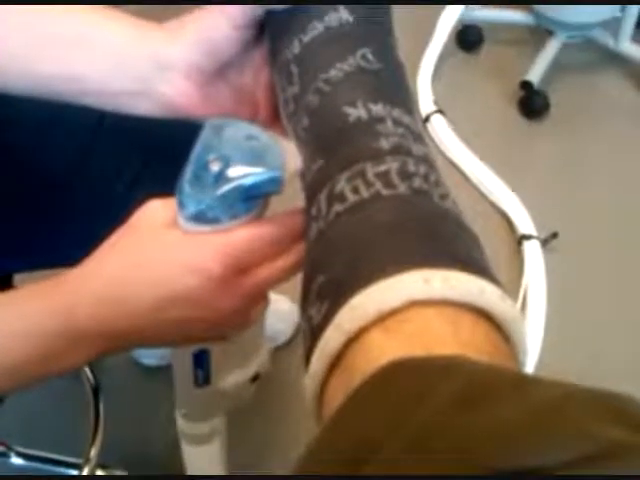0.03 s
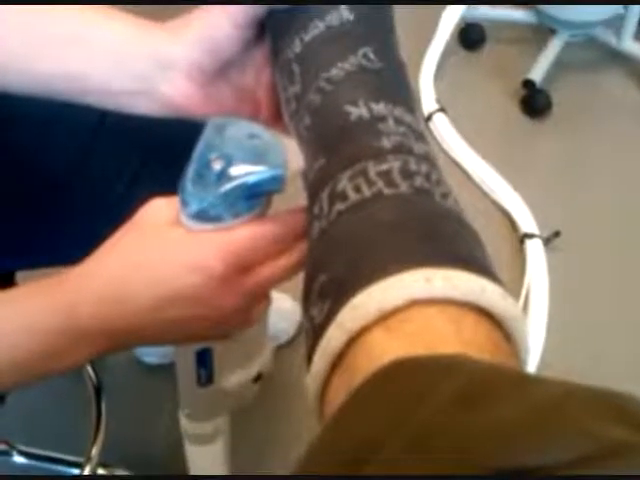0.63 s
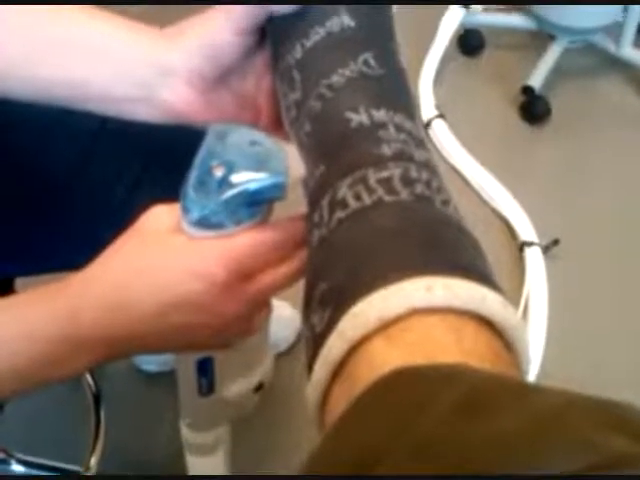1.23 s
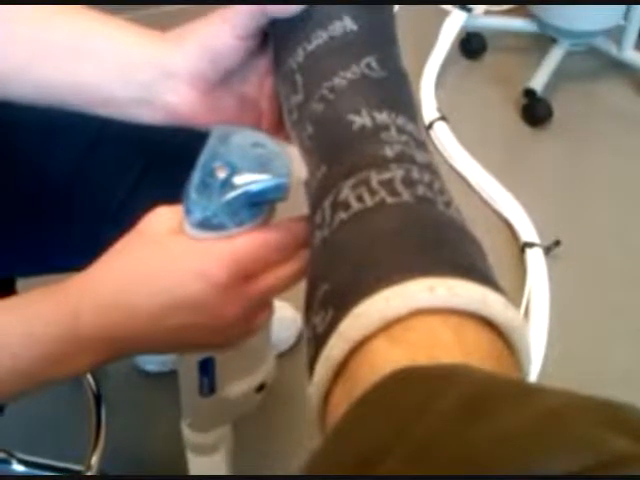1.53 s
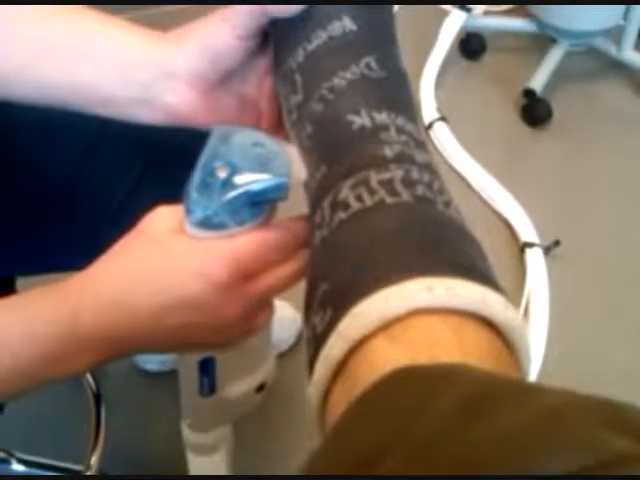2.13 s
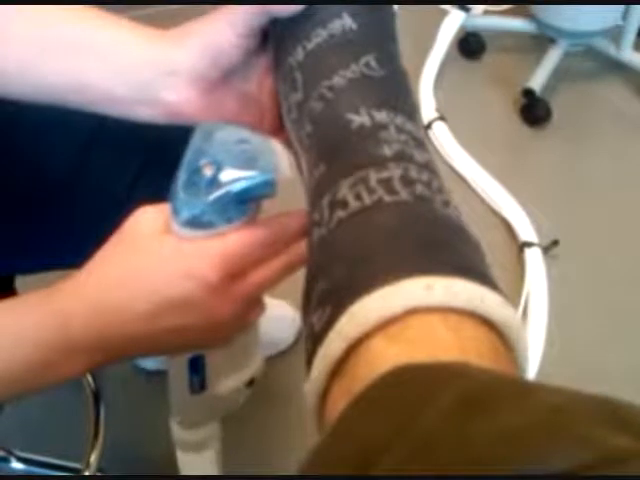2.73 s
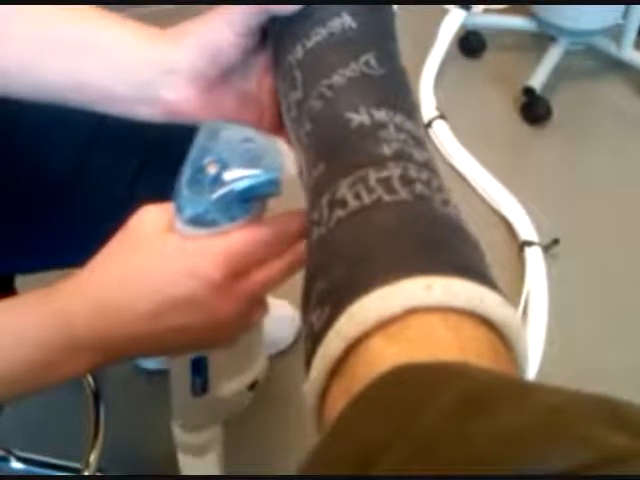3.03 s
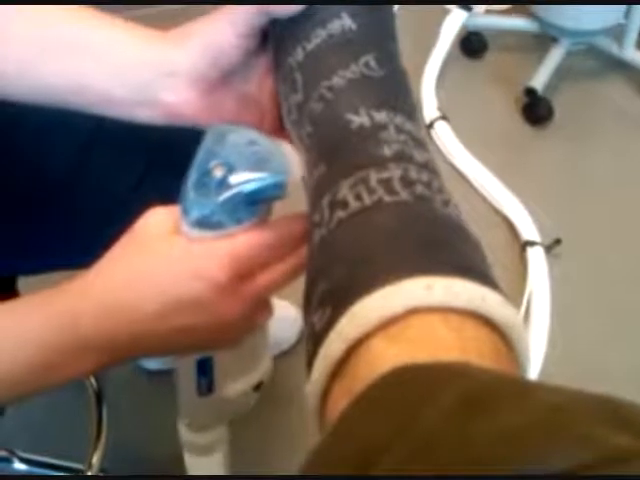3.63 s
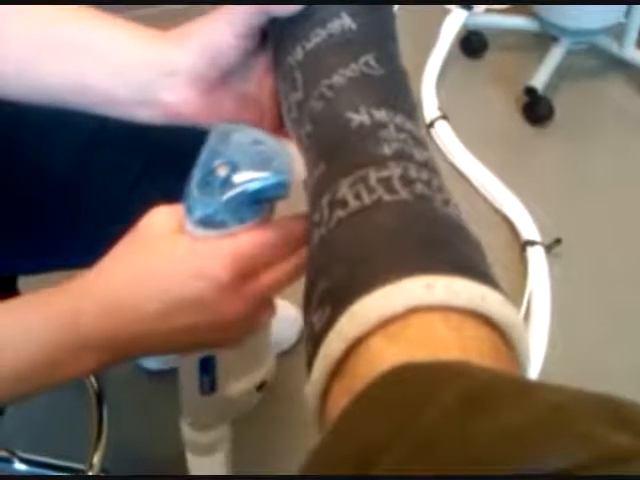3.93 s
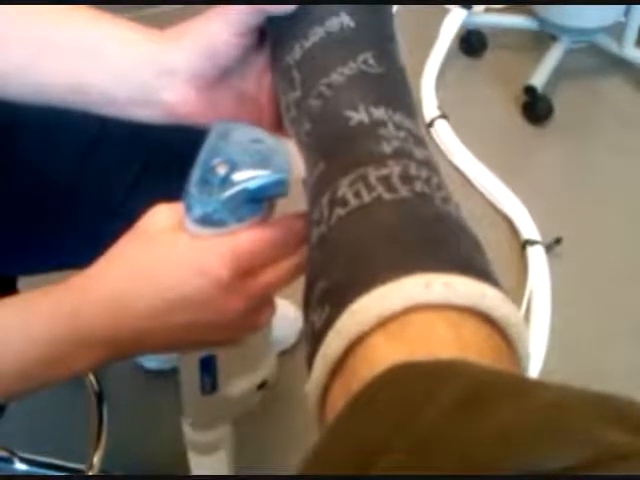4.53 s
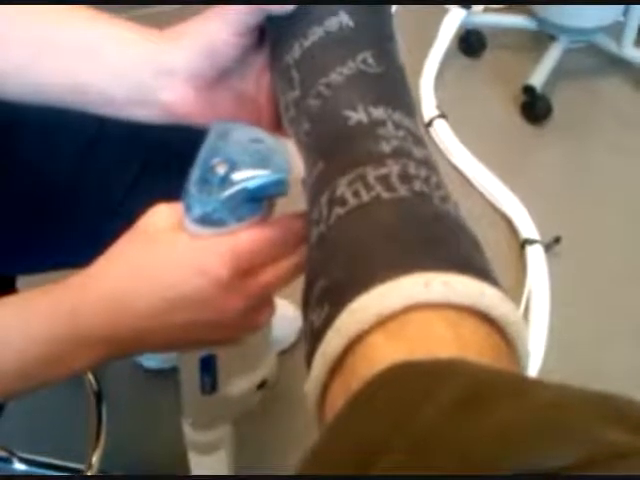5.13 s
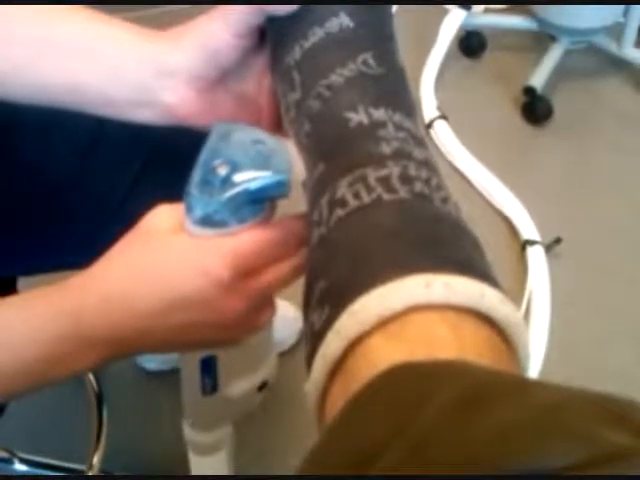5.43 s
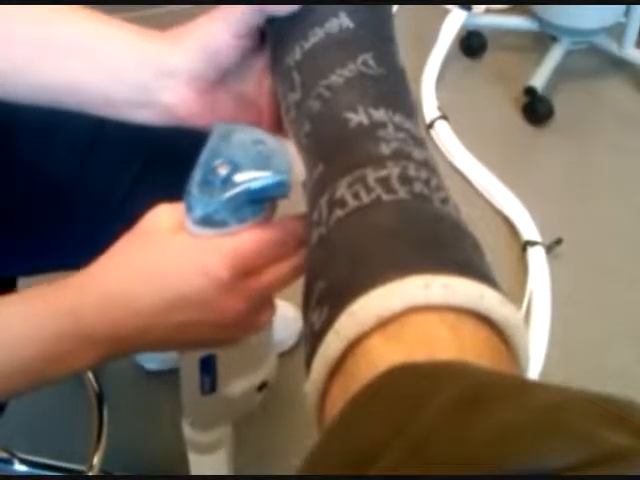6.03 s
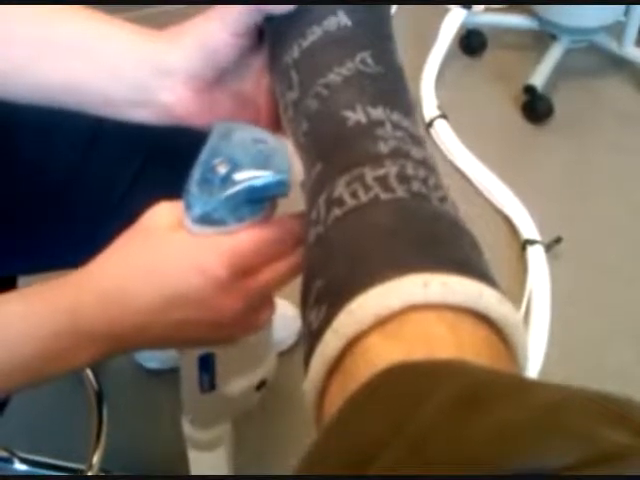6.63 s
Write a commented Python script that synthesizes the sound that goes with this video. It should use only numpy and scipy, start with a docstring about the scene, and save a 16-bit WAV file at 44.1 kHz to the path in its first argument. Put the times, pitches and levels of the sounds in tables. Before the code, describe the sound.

An electric cast saw runs for the whole seven seconds, heard from about an arm's length in a small room with slight reverberation. From the start it is cutting a hard leg cast: a harsh, bright buzz with gritty rasp, shell rattle and hiss, swelling in small pushes, with brief squealing tones. At about 2.4 seconds the blade eases out of the cut. The saw speeds up slightly and gives a higher, cleaner ringing whine until about 3.6 seconds. It then grazes the shell with a fuller buzz, and at about 4.5 seconds bites in again, its pitch dropping back. The cutting continues to the end with uneven surges and short squeals, the clearest around 5.7 and 6.6 seconds. A faint motor hum and a soft rush of cooling air lie underneath throughout.

```python
"""An electric cast saw cuts along a hard leg cast in a small treatment room.
Its blade swings about 183 times a second, and this periodic drive excites a harmonic series: motor hum
below, the buzz of shell and blade above. Tooth impacts and tearing fibres add rattle, rasp and hiss over
faint cooling air. Midway the saw is eased out of the cut; unloaded, it speeds up and sings more purely,
then grazes the shell and bites again."""
import sys
import numpy as np
from scipy import signal
from scipy.fft import rfft, irfft, next_fast_len
from scipy.io import wavfile

SR = 44100
rng = np.random.default_rng(int(sys.argv[2]) if len(sys.argv) > 2 else 0)


def transcribe(signal):
    """Save signal, clipped to [-1, 1], as a 16-bit WAV file at the path in sys.argv[1]."""
    frames = np.atleast_2d(signal).T
    limited = np.clip(frames, -1, 1)
    pcm = np.round(limited * 32767).astype(np.int16)
    wavfile.write(sys.argv[1], SR, pcm)


N = 302967
TIME = np.arange(N) / SR
MAINS_HZ = 60


def from_db(db):
    return 10 ** (np.asarray(db) / 20)


def rms_one(x):
    return x / np.sqrt(np.mean(x ** 2) + 1e-20)


def in_time(rows):
    """Linear interpolation of (seconds, value) rows at every sample."""
    return np.interp(TIME, *np.transpose(rows))


def filtered(x, gain_at):
    """Zero-phase filtering: the spectrum is multiplied by a gain that depends on frequency."""
    size = next_fast_len(N + 4096)
    return irfft(rfft(x, size) * gain_at(np.fft.rfftfreq(size, 1 / SR)), size)[:N]


def coloured(x, spectrum):
    """Spectral shaping by an envelope drawn on a log-frequency axis; the result has rms 1."""
    points_hz, level_db = np.transpose(spectrum)
    return rms_one(filtered(x, lambda hz: from_db(np.interp(np.log(hz + 1), np.log(points_hz), level_db))))


def drift(rate_hz):
    """Slow random fluctuation of rms 1: low-passed noise, computed at every 20th sample."""
    pole = np.exp(-40 * np.pi * rate_hz / SR)
    slow = signal.lfilter([1], [1, -2 * pole, pole * pole], rng.standard_normal(N // 20 + 1002))[1000:]
    return np.interp(np.arange(N) / 20, np.arange(len(slow)), rms_one(slow))


def partial(cycles, harmonic, roughness, dispersion=.065):
    """A harmonic with random amplitude and phase modulation; dispersion makes higher ones lag."""
    angle = 2 * np.pi * (harmonic * cycles - dispersion * harmonic ** 2)
    in_phase = (1 + roughness * drift(13)) * np.cos(angle)
    quadrature = 0.77 * roughness * drift(13) * np.sin(angle)
    return np.sqrt(2) * (in_phase + quadrature)


def mains_ripple(once, twice):
    """Torque ripple: the motor pulses once and twice per mains cycle."""
    angle = 2 * np.pi * MAINS_HZ * TIME
    return once * np.cos(angle) + twice * np.cos(2 * angle)


def room(x, t60_s=.3):
    """Reverberation: dense reflections from near walls decay exponentially."""
    age = TIME[:SR // 2]
    tail = rng.standard_normal(len(age)) * from_db(-60 * age / t60_s) * (age > .004)
    return signal.fftconvolve(x, tail / np.linalg.norm(tail))[:N]


# Spectrum of the motor's cooling air. Each row: frequency in Hz, relative density in dB.
AIR_SPECTRUM = [(25, -2), (55, -42.5), (100, -8), (150, -11), (240, -22.5), (310, -9.5), (480, -2.5),
                (670, -10), (900, -2), (4000, -51)]
def cooling_air(bite):
    """Flow noise from the motor's cooling air, a little louder under load."""
    return from_db(-58.945 + 3.27 * bite) * coloured(rng.standard_normal(N), AIR_SPECTRUM)


def winding_hum():
    """Mains hum: the windings vibrate at the fifth harmonic of the supply."""
    return from_db(-65) * partial(MAINS_HZ * TIME, 5, roughness=0.27)


def knocks(strokes, uneven_db, jitter_s):
    """An impulse train: the teeth hit the kerf going out and more lightly coming back."""
    out = np.zeros(N)
    for phase, strength in ((0, 0.75), (.43, 0.32)):
        at = np.flatnonzero(np.diff(np.floor(strokes - phase)) > 0)
        timing, height = rng.standard_normal((2000, 2))[:len(at)].T
        at = np.clip(at + np.round(jitter_s * SR * timing).astype(int), 0, N - 1)
        out[at] += strength * from_db(uneven_db * height)
    return out


def smeared(x, spread_s):
    """Multipath propagation: the shell spreads a knock in time without favouring a pitch."""
    age = TIME[:SR // 40]
    paths = rfft(rng.standard_normal(len(age)) * np.exp(-age / spread_s), 2 * len(age))
    all_pass = np.fft.fftshift(irfft(paths / np.abs(paths)))
    return signal.oaconvolve(x, all_pass)[len(age):len(age) + N]


def sawing(strokes, spectrum, grit, spread_s, bunching, uneven_db, jitter_s):
    """Impact and fracture noise: teeth knock and fibres tear; grit is the tearing's share of the power."""
    clicks = knocks(strokes, uneven_db, jitter_s)
    # the point of contact slides, so the paths change and single partials come and go
    slide = 1.2 * drift(1.5)
    hits = np.cos(slide) * smeared(clicks, spread_s) + np.sin(slide) * smeared(clicks, spread_s)
    bursts = np.exp(bunching * np.cos(2 * np.pi * strokes))
    tearing = rng.standard_normal(N) * bursts * from_db(uneven_db * 1.5 * np.tanh(drift(140) / 1.5))
    excitation = np.sqrt(1 - grit) * rms_one(hits) + np.sqrt(grit) * rms_one(tearing)
    return coloured(excitation * (1 + mains_ripple(once=0.06, twice=0.03)), spectrum)


# Spectrum of the cast's shell. Each row: frequency in Hz, relative density in dB.
SHELL_SPECTRUM = [(760, -38.5), (930, -18), (1080, -4), (1450, -4), (1720, 4), (1950, -1), (2300, -19),
                  (3000, -46.5)]
def shell_rattle(strokes, bite, drive_db, rise_db_per_s=.5):
    """Forced vibration of the shell, growing as the cut moves along the cast."""
    gain = from_db(-40.5 + rise_db_per_s * TIME + drive_db - 2 * (1 - bite))
    return gain * sawing(strokes, SHELL_SPECTRUM, grit=0.81, spread_s=.0015,
                         bunching=0.24, uneven_db=3.5, jitter_s=8e-5)


# Spectrum of the rasping kerf. Each row: frequency in Hz, relative density in dB.
KERF_SPECTRUM = [(1400, -53.5), (1800, -11.5), (2100, 0), (2560, 0), (2900, 1.5), (3270, 0.5), (3500, -4),
                 (3850, -3.5), (4020, -25), (5000, -40.5)]
def kerf_rasp(strokes, bite, force_db):
    """Abrasion in the kerf, its power proportional to the bite."""
    gain = np.sqrt(bite) * from_db(-31 + .75 * force_db)
    return gain * sawing(strokes, KERF_SPECTRUM, grit=0.52, spread_s=.0026,
                         bunching=0.51, uneven_db=-1.0, jitter_s=3e-5)


# Spectrum of the loose blade. Each row: frequency in Hz, relative density in dB.
LOOSE_SPECTRUM = [(1400, -37.5), (2000, -2), (2400, -15), (2750, -3.5), (3100, -9.5), (3800, -4),
                  (3950, -4), (4600, -33.5)]
def loose_blade(strokes, bite, force_db):
    """Broadband vibration of the loose blade, which replaces the rasp as the bite eases."""
    gain = np.sqrt(1 - bite) * from_db(-31.95 + .75 * force_db)
    return gain * sawing(strokes, LOOSE_SPECTRUM, grit=0.42, spread_s=.0029,
                         bunching=0.25, uneven_db=-1.3, jitter_s=1e-5)


# Spectrum of the teeth. Each row: frequency in Hz, relative density in dB.
TEETH_SPECTRUM = [(3000, -43), (3700, -7), (4000, -10), (4220, 0), (4480, -3.5), (4760, -3), (5100, -10),
                  (5550, -8.5), (6250, -12), (6500, -11), (6780, -10.5), (7050, -12.5)]
def tooth_hiss(strokes, bite, drive_db, fade_db_per_s=1.4159):
    """High-frequency contact noise of the teeth, fading along the cut and weaker when they only graze."""
    grazing = 1 - np.abs(2 * bite - 1)
    gain = from_db(-23.5 - fade_db_per_s * TIME + drive_db - 3 * grazing)
    return gain * sawing(strokes, TEETH_SPECTRUM, grit=0.36 + 0.1 * bite, spread_s=.0033,
                         bunching=0.077, uneven_db=1.0, jitter_s=1e-5)


# Squeals. Each row: start and end in seconds, harmonic number of the stroke rate, level in dB.
SQUEAL_EVENTS = [(0, .24, 23, -35), (.413, 1.018, 26, -31.5), (.55, 0.896, 12, -32), (1.05, 1.62, 11, -44),
                 (1.27, 1.9, 17, -40.5), (2.12, 2.433, 12, -37), (2.985, 3.77, 20, -40.5),
                 (3.758, 3.974, 14, -38), (4.7, 6.9, 18, -38), (5.01, 5.637, 6, -48), (5.518, 5.82, 8, -43),
                 (5.58, 5.853, 15, -29), (6.1, 6.458, 8, -39), (6.524, 6.784, 12, -31),
                 (6.675, 6.9, 6, -41)]
def squeals(strokes, swell_s=0.075):
    """Resonant amplification: as the blade shifts in the kerf, single partials swell, hold and let go."""
    out = np.zeros(N)
    for start, end, harmonic, level_db in SQUEAL_EVENTS:
        swell = np.clip(np.minimum(TIME - start, end - TIME) / swell_s, 0, 1)
        out += from_db(level_db) * swell * partial(strokes, harmonic, roughness=0.39)
    return out


# Rasp, rattle, ring or hiss swells as the saw presses in or its free blade sings. Each row: start and
# end in seconds, then the change in force, shell rattle, blade ring and tooth hiss, all in dB.
SAW_SWELLS = [(-.1, 0.282, .8, 6, 0, 1.5), (.49, 1.05, 1, 5, 1, .5), (1.223, 1.56, 1, 2.5, 0.5, -0.5),
              (1.936, 2.207, 0.5, 2, 5, 1), (2.118, 2.498, 1, 2.5, 1, 0.5), (2.7, 3.15, -0.4, -1.5, 6.5, 0),
              (3.08, 3.82, -0.5, 2.5, 4.5, 0.5), (3.78, 3.997, 1, 1.5, -4, -3),
              (4.206, 4.44, 0.5, 2.5, 5, 1), (4.46, 4.874, 2, 0, 2, -1), (4.84, 5.176, 1.5, 2, 2.5, -2),
              (5.104, 5.56, 1.5, 4.5, 5.5, -2.5), (5.51, 5.85, 1.5, 4, 1, 3), (5.88, 6.09, 0, 6.5, -1, 1),
              (6.13, 6.38, 1, 2.5, 8, 4), (6.292, 6.498, 0, 5.5, 3.5, 5), (6.68, 6.92, 3, 3.5, 0.5, 1)]
def swells(attack_s=0.069, release_s=0.075):
    """Amplitude envelopes: each swell builds up, holds and eases off; four dB curves."""
    out = np.zeros((4, N))
    for start, end, *levels_db in SAW_SWELLS:
        shape = np.clip(np.minimum((TIME - start) / attack_s, (end - TIME) / release_s), 0, 1)
        out += np.outer(levels_db, shape)
    return out


# Slips of the teeth. Each row: start in seconds, force lost in dB, further ring lost in dB.
TOOTH_SLIPS = [(.98, 2.5, 7), (2.441, 1, -3.5), (3.05, 0, 20), (4.41, 1, 4)]
def slips(slip_s=0.037, regrip_s=0.068):
    """Frictional slip: grip is lost suddenly and recovers exponentially; two dB curves."""
    out = np.zeros((2, N))
    for start, *lost_db in TOOTH_SLIPS:
        age = TIME - start
        shape = np.clip(age / slip_s, 0, 1) * np.exp(-np.maximum(age - slip_s, 0) / regrip_s)
        out += np.outer(lost_db, shape)
    return out


# Motor speed, higher off load. Each row: time in seconds, strokes per second.
STROKE_RATE = [(0.0, 184.6), (0.56, 183.6), (0.92, 184.2), (1.92, 182.8), (2.24, 181.7), (2.38, 182.1),
               (2.65, 188.0), (3.04, 188.7), (3.13, 192.7), (3.71, 192.8), (3.94, 190.7), (4.32, 190.3),
               (4.56, 183.4), (5.42, 182.6), (5.66, 181.3), (5.99, 183.0), (6.68, 181.5), (6.87, 182.2)]
# Contact with the cast. Each row: time in seconds, state (0 free, 1 grazing, 2 biting).
BLADE_CONTACT = [(0, 1.73), (2.38, 1.88), (2.48, 0.16), (2.65, 0.012), (3.58, 0.25), (3.75, 1), (4.36, 1),
                 (4.52, 1.91), (6.87, 1.81)]
def blade_motion():
    """Phase-modulated oscillation: returns strokes elapsed, their rate in Hz and the bite from 0 to 1."""
    stroke_hz, bite = in_time(STROKE_RATE), in_time(BLADE_CONTACT) / 2
    stagger = (0.38 + bite) * mains_ripple(once=0.0028, twice=0.0034)
    snagging = (0.0032 + 0.003 * bite) * drift(9.2)
    return np.cumsum(stroke_hz) / SR + stagger + snagging, stroke_hz, bite


# The blade's main resonance. Each row: time in seconds, centre frequency in Hz.
RESONANCE_CENTRE = [(0, 1900), (1.2, 1760), (1.32, 1800), (2.4, 1715), (4.7, 1773), (5.4, 1685),
                    (5.95, 1625), (6.24, 1726), (6.87, 1676)]
def blade_resonance_db(hz, width_hz=113, peak_db=2.5):
    """Response of a damped resonator whose centre shifts with the grip of the kerf."""
    detuning = 2 * (hz - in_time(RESONANCE_CENTRE)) / width_hz
    return peak_db - 10 * np.log10(1 + detuning ** 2)


# Line spectra of the saw in its three states. Each row: harmonic number, relative level in dB.
FREE_LINES = [(1, -24), (2, -28.5), (3, -33), (4, -38), (5, -23.5), (6, -12.5), (7, -5), (8, -12.5), (9, 0),
              (10, -21), (11, -13), (12, -24.5), (13, -14.5), (14, -21.5)]
GRAZING_LINES = [(1, -18), (2, -14.5), (3, -16.5), (4, -14), (5, -7.5), (6, -1), (7, -3.5), (8, -2),
                 (9, -3), (10, -2), (11, -1.5), (12, -11.5), (13, -5), (14, -8)]
BITING_LINES = [(1, -24), (2, -26.5), (3, -17), (4, -26), (5, -23), (6, -15.5), (7, -12.5), (8, -13),
                (9, 0), (10, 1.5), (11, -7), (12, -6.5), (13, -7), (14, -12)]
def saw_buzz(strokes, stroke_hz, bite, force_db, rattle_db, ring_db, fundamental_db=-54):
    """Periodic forcing: motor, shell and blade each radiate a range of harmonics of the stroke rate."""
    states_db = np.array([FREE_LINES, GRAZING_LINES, BITING_LINES])[:, :, 1].T
    grip = np.clip(2 * bite - 1, 0, 1)
    out = np.zeros(N)
    for harmonic, relative_db in enumerate(states_db - states_db[0], start=1):
        level_db = fundamental_db + np.interp(bite, [0, .5, 1], relative_db)
        if harmonic <= 5:   # motor hum
            lift_db, roughness = 0, 0.27
        elif harmonic <= 8:   # shell buzz
            lift_db, roughness = force_db + rattle_db - 3.16, 0.21
        elif harmonic <= 10:   # blade ring, near the main resonance
            resonance_db = grip * blade_resonance_db(harmonic * stroke_hz)
            lift_db, roughness = resonance_db + ring_db + 0.21 * force_db, 0.14
        else:   # upper blade buzz
            lift_db, roughness = 0.97 * force_db - 0.85, 0.21
        out += from_db(level_db + lift_db) * partial(strokes, harmonic, roughness)
    return out


def scene():
    """Superposition of saw and cast at one point an arm's length away."""
    strokes, stroke_hz, bite = blade_motion()
    force_db, rattle_db, ring_db, hiss_db = swells()
    force_lost_db, ring_lost_db = slips()
    force_db -= force_lost_db
    ring_db -= ring_lost_db
    cutting = shell_rattle(strokes, bite, force_db + rattle_db)
    cutting += kerf_rasp(strokes, bite, force_db) + loose_blade(strokes, bite, force_db)
    cutting += tooth_hiss(strokes, bite, force_db + hiss_db)
    cutting *= from_db(0.8 * bite * drift(22))   # the weave of the cast resists unevenly
    air = cooling_air(bite)
    buzz = saw_buzz(strokes, stroke_hz, bite, force_db, rattle_db, ring_db)
    tones = buzz + winding_hum() + squeals(strokes)
    mono = air + from_db(-6) * room(cutting) + cutting + tones
    return np.stack([mono, mono])


def record(dry, cutoff_hz=7280):
    """Band limiting: a narrow-band microphone channel cuts the treble steeply."""
    return np.stack([filtered(x, lambda hz: np.clip((cutoff_hz - hz) / 60 + .5, 0, 1)) for x in dry])


dry = scene()
out = record(dry)
transcribe(out)
```